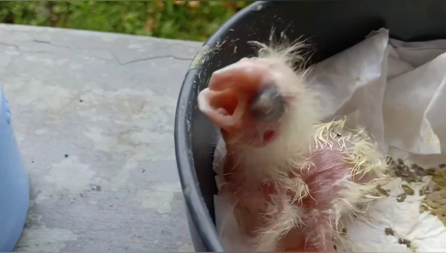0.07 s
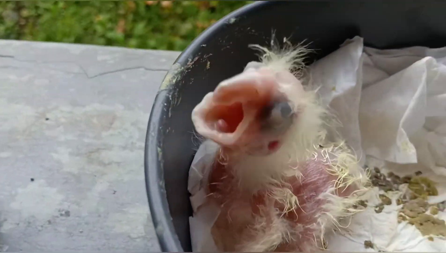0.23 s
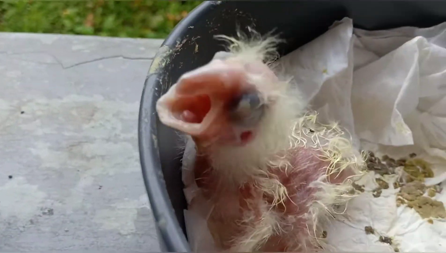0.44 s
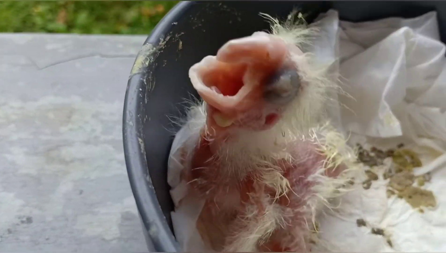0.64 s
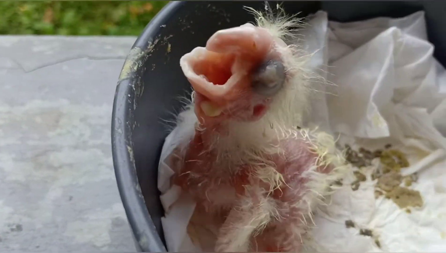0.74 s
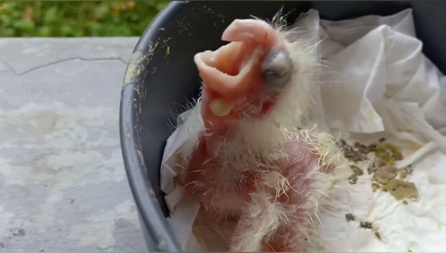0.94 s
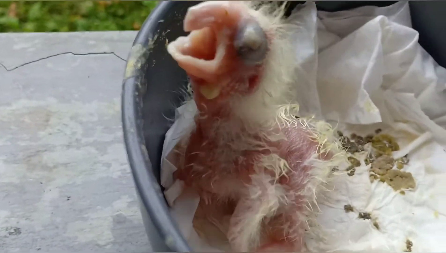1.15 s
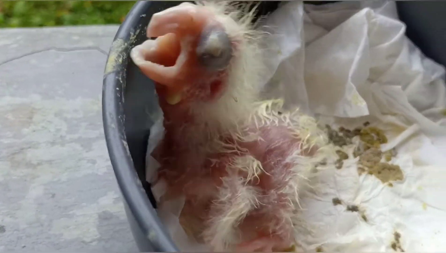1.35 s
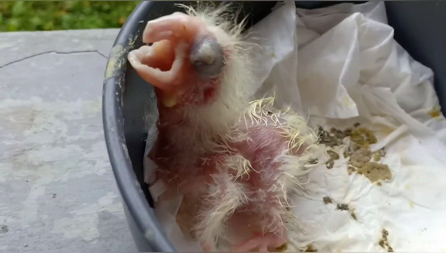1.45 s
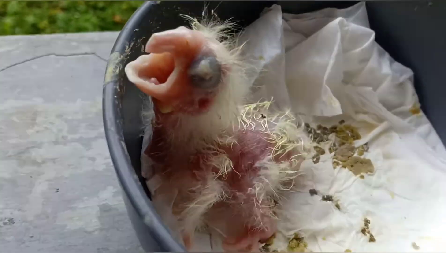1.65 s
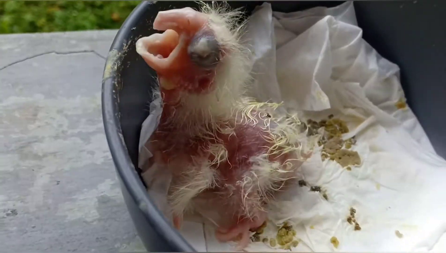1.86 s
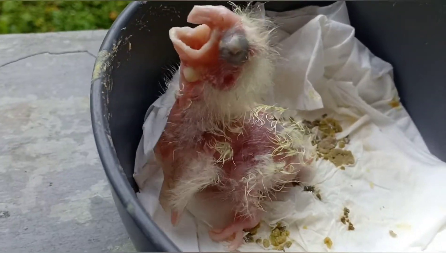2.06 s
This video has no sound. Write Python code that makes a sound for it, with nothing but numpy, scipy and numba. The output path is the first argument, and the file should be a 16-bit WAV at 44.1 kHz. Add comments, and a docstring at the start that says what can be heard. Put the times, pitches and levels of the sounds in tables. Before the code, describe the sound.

Close by and slightly to the right, a cockatoo chick on a porch gives two hoarse begging calls, each ending in a falling whistle. Its beak clicks before each. Crickets ring behind, over faint traffic and stirring leaves.

```python
"""On a porch, a cockatoo chick in a bowl gives two hoarse begging calls, close by and off to the right.
Its chaotic voice rasps through the throat and settles into a falling whistle as each call ends;
the beak snaps shut before each one. Behind it, a cricket chorus rings in narrow bands over distant
traffic, a low hum and stirring leaves. Small ticks sound nearby, and another bird rasps far off."""
import sys
import numpy as np
from scipy import signal
from scipy.fft import rfft, irfft, next_fast_len
from scipy.io import wavfile
from scipy.ndimage import uniform_filter1d
from numba import njit

SR = 44100
rng = np.random.default_rng(int(sys.argv[2]) if len(sys.argv) > 2 else 0)


def master(y):
    """Save y as 16-bit WAV."""
    cut = np.clip(np.atleast_2d(y).T, -1, 1)
    pcm = np.round(cut * 32767)  # scale
    wavfile.write(sys.argv[1], SR, pcm.astype(np.int16))


N = 92213


def undb(db):
    return np.exp(np.asarray(db, float) * np.log(10) / 20)


def unit(x):
    return x / np.sqrt(np.mean(x ** 2))


def noise():
    return rng.standard_normal(N)


def pan(db):
    """Stereo gains that set the left db above the right."""
    return undb([[db / 2], [-db / 2]])


def eq(x, hz, db):
    """Draws an EQ curve through dB points on a log-frequency axis."""
    size = next_fast_len(N)
    f = np.log(np.arange(size // 2 + 1) * SR / size + 1)
    return irfft(rfft(x, size) * undb(np.interp(f, np.log(hz), db)), size)[:N]


def curve(rows, column=1, outside=None):
    """Envelope through one column of a table that starts with time."""
    rows = np.array(rows, float)
    return np.interp(np.arange(N) / SR, rows[:, 0], rows[:, column], outside, outside)


def drift(rate):
    """Smooth random modulation, rate steps a second, spread near 1."""
    steps = np.repeat(rng.standard_normal(int(N / SR * rate) + 3), 4)
    smooth = uniform_filter1d(uniform_filter1d(steps, 4), 4)
    return 1.3 * np.interp(np.arange(N) * (4 * rate / SR), np.arange(len(smooth)), smooth)


def band(x, hz, width, passes=1):
    """Static band-pass, gain 1; more passes steepen it."""
    for _ in range(passes):
        x = signal.lfilter(*signal.iirpeak(hz, hz / width, fs=SR), x)
    return x


@njit
def swept_band(x, hz, width):
    """Band-pass with a moving centre, gain 1."""
    y, band_state, low_state = np.empty(len(x)), 0., 0.
    for i in range(len(x)):
        g, damping = np.tan(np.pi * hz[i] / SR), width / hz[i]
        v = (band_state + g * (x[i] - low_state)) / (1 + g * (g + damping))
        band_state = 2 * v - band_state
        low_state += 2 * g * v
        y[i] = damping * v
    return y


# Tone of the traffic bed (frequency [Hz], relative level [dB])
TRAFFIC_EQ = [(25, -22), (60, -7.5), (95, -0.5), (180, -1.5), (300, -7), (500, -13.5), (900, -15),
              (1400, -24), (2400, -18), (3200, -26), (5000, -16.5), (6500, -28.5), (8000, -44.5),
              (12500, -36.5), (14500, -45), (15500, -57)]
def traffic(level_db=-55.5, shared_below_hz=680):
    """A wash of distant traffic and leaves: centred in the bass, wide and leaning left above."""
    hz, db = np.array(TRAFFIC_EQ).T
    lowpass = signal.butter(1, shared_below_hz, fs=SR, output="sos")
    shared = noise()
    left, right = [own + .84 * signal.sosfilt(lowpass, shared - own) for own in (noise(), noise())]
    lean_db = np.clip(np.log2(hz / 500), 0, 1)
    return unit(np.array([eq(left, hz, db + lean_db), eq(right, hz, db - lean_db)])) * undb(level_db)


# Path of the hum (time [s], pitch [Hz], level [dB])
HUM = [(0.0, 150, -76), (0.38, 147.7, -64), (0.55, 146.1, -58.5), (1.58, 153.8, -62.5), (1.93, 149.9, -67),
       (2.09, 135.0, -61)]
def hum():
    """A low tone wavers within the traffic."""
    phase = 2 * np.pi * np.cumsum(curve(HUM) + 3 * drift(15.57)) / SR
    return np.sqrt(2) * np.sin(phase) * undb(curve(HUM, column=2) + 2 * drift(11.5))


# Single crickets (pitch [Hz], throb rate [Hz], left level [dB], right level [dB])
NEAR_CRICKETS = [(4805, 59, -49.5, -50), (4855, 47, -43.5, -54), (4370, 43, -57, -68)]
def near_crickets(throb_depth=.943, swell_db=4, waver_hz=6.7):
    """A few near singers throb, each on its own wavering tone."""
    def sing(hz, rate, db):
        cycles = np.cumsum(rate * (1 + .0928 * drift(8))) / SR + rng.random()
        throb = 1 + throb_depth * np.sin(2 * np.pi * cycles)
        swell = undb(db + swell_db * drift(5.95))
        return throb * swell * np.sin(2 * np.pi * np.cumsum(hz + waver_hz * drift(30.14)) / SR)
    return sum(np.array([sing(hz, rate, db) for db in levels]) for hz, rate, *levels in NEAR_CRICKETS)


# Bands of far insects (centre [Hz], width [Hz], left level [dB], right level [dB])
CHORUS_BANDS = [(4836, 116, -46.5, -49), (4570, 79, -60, -57.5), (3870, 54, -68.5, -78.5),
                (5760, 200, -63, -79), (13470, 56, -75, -83.5), (13850, 880, -70.5, -81.5)]
def cricket_chorus(shimmer_db=2):
    """Far singers blur into narrow bands of noise, unrelated left and right."""
    size = next_fast_len(N)
    f = np.arange(size // 2 + 1) * SR / size
    out = np.zeros((2, N))
    for side in range(2):
        spectrum = sum(undb(levels[side]) * np.exp(-((f - hz) / width) ** 2) * np.sqrt(SR / 2 / width)
                       for hz, width, *levels in CHORUS_BANDS)
        chorus = irfft(rfft(noise(), size) * spectrum, size)[:N]
        out[side] = chorus * undb(shimmer_db * drift(60.15))
    return out


# Swell of the leaves (time [s], level [dB])
LEAF_SWELL = [(0, -64), (.1, -56), (.4, -60.5), (.8, -64), (1.1, -72), (1.5, -68), (2.09, -70)]
def leaves():
    """Leaves stir softly in a broad band of noise, unrelated left and right."""
    sides = [unit(band(noise(), hz=2300, width=2200, passes=2))
             * undb(curve(LEAF_SWELL) + 1.13 * drift(21.5)) for _ in range(2)]
    return np.array(sides) * pan(3)


# Tick cues (time [s], gain [dB], centre [Hz], width [Hz], 60 dB decay [s], pan to the left [dB])
TICKS = [(0.075, -49, 1390, 2530, 0.048, -2.5), (0.119, -44.5, 1280, 2570, 0.086, -3),
         (1.027, -47.5, 2600, 800, 0.041, 6), (1.495, -40.5, 1960, 910, 0.033, 8)]
def ticks():
    """Small ticks and scuffs: dull noise bursts that die away."""
    out, t = np.zeros((2, N)), np.arange(SR // 10) / SR
    for time, db, hz, width, t60, pan_db in TICKS:
        burst = rng.standard_normal(len(t)) * undb(db - 60 * t / t60) * np.sqrt(SR / 2 / width)
        start = int(time * SR)
        out[:, start:start + len(t)] += band(burst, hz, width, passes=3) * pan(pan_db)
    return out


# Ring of the beak (frequency [Hz], relative level [dB], 60 dB decay [s])
BEAK_MODES = [(790, -10, 0.017), (1900, -10, 0.0074), (2740, -2.5, 0.0072), (4130, -7, 0.011),
              (5710, 2.5, 0.009)]
# Snap cues (time [s], gain [dB], pan to the left [dB])
BEAK_SNAPS = [(0.0987, -38, 1.5), (1.4379, -35, 2.1)]
def beak_snaps(attack_s=.00036):
    """The beak snaps shut: one tap rings its modes."""
    out, t = np.zeros((2, N)), np.arange(SR // 20) / SR
    ring = sum(undb(db - 60 * t / t60) * np.sin(2 * np.pi * hz * t) for hz, db, t60 in BEAK_MODES)
    ring *= np.minimum(t / attack_s, 1)
    for time, db, pan_db in BEAK_SNAPS:
        start = int(time * SR)
        out[:, start:start + len(t)] += ring * undb(db) * pan(pan_db)
    return out


def rasp(pitch, jitter=.3, scatter_db=3):
    """The membrane slaps at half the whistle pitch, uneven in spacing and size, with as much breath."""
    cycles = np.cumsum(pitch / 2 * np.exp(jitter * drift(1500))) / SR
    slaps = np.diff(np.floor(cycles), prepend=0) * undb(scatter_db * noise())
    return unit(slaps - slaps.mean()) + noise()


def whistle(score, pitch, wobble=.0065, flutter_db=2):
    """The tone in the voice, brightened by overtones and roughened by multiples of half its pitch."""
    phase = 2 * np.pi * np.cumsum(pitch * (1 + wobble * drift(300))) / SR
    overtones = undb(curve(score, column=4)) * (np.sin(2 * phase) + undb(-16.5) * np.sin(3 * phase))
    growl = sum(undb(db) * np.sin(ratio * phase)
                for ratio, db in ((.5, -23.5), (1.5, -6), (2.5, 0), (3, -9.5)))
    growl *= undb(curve(score, column=5))
    level = np.sqrt(2) * undb(curve(score, column=3, outside=-120) + flutter_db * drift(120))
    edge = level * (overtones + growl) + quarter_lock(score, phase)
    return (level * np.sin(phase) + edge * pan(-7.5)) * pan(-2.5)


def quarter_lock(score, phase, start_s=1.984, end_s=2.004):
    """In the call that spans start_s, the membrane briefly locks on a quarter of the pitch."""
    if not score[0][0] < start_s < score[-1][0]:
        return 0
    gate = uniform_filter1d(curve([(start_s, 1), (end_s, 1)], outside=0), size=130)
    return gate * sum(undb(db) * np.sin(k * phase / 4)
                      for k, db in ((1, -44.5), (3, -42), (5, -46), (7, -35), (9, -26.5)))


# Tone of the rasp at the two mics (frequency [Hz], left gain [dB], right gain [dB])
RASP_EQ = [(450, -51, -69), (660, -19.5, -13), (895, -14, -12.5), (1370, -17, -18.5), (1760, -9.5, -11),
           (2330, -9, -7.5), (2865, -8, -6.5), (3300, -25.5, -3.5), (3980, -6, -5.5), (4840, -9, -1.5),
           (6200, -9.5, -2.5), (6650, -1.5, -6.5), (6980, -3, 3.5), (7440, -12, -5), (9420, -14.5, -14.5),
           (10460, -27, -20.5), (11350, -21.5, -11), (12900, -22, -19), (13300, -19, -10),
           (15100, -32, -16.5), (15400, -57, -30), (16000, -80, -49)]
def begging_call(score, throat, waver=.011, flicker_db=1.5, shared_power=.92, shared_below_hz=7460):
    """One call in stereo: rasp through gliding, wavering throat resonances, whistle on top."""
    start_s, end_s = score[0][0], score[-1][0]
    span = slice(int(start_s * SR), int(end_s * SR))
    pitch = curve(score, column=2)
    shared = rasp(pitch)
    tone = whistle(score, pitch)
    effort = undb(curve(score, outside=-120) + .5 * drift(90))
    formants = []
    for hz0, hz1, width, db0, db1, left_db in throat:
        centre = curve([(start_s, hz0), (end_s, hz1)]) * (1 + waver * drift(39.85))
        boost_db = curve([(start_s, db0), (end_s, db1)]) + flicker_db * drift(59.96)
        formants.append((centre[span], width, undb([boost_db[span] + left_db, boost_db[span]])))
    lowpass = signal.butter(4, shared_below_hz, fs=SR, output="sos")
    eq_hz, *eq_db = np.array(RASP_EQ).T
    voice = np.zeros((2, N))
    for side in range(2):
        own = rasp(pitch)
        blend = np.sqrt(shared_power) * shared + np.sqrt(1 - shared_power) * own
        source = own + signal.sosfiltfilt(lowpass, blend - own)  # only the top stays wide
        for centre, width, boost in formants:
            source[span] += (boost[side] - 1) * swept_band(source[span], centre, width)
        voice[side] = eq(source, eq_hz, eq_db[side])
    return voice / np.std(voice[0, span]) * effort + tone


# Performance of each call (time [s], left rasp level [dB], whistle pitch [Hz], whistle level [dB],
# overtones against whistle [dB], growl against whistle [dB])
FIRST_CALL = [(.4092, -52, 3100, -56, -8, -10), (.412, -25, 2820, -32, -3, -4),
              (.421, -24, 2790, -34, -1, -6), (.424, -30, 2370, -30, -13, 5),
              (.437, -31, 2262, -32, -10, 8), (.443, -22, 2230, -44, -6, 6), (.453, -25, 2200, -36, -6, 10),
              (.459, -22, 2120, -43, -6, 8), (.466, -27, 2088, -37, -9, 12), (.474, -22, 2050, -46, -6, 8),
              (.49, -21, 2298, -44, 0, -6.5), (.56, -22.5, 2542, -33.5, -8, -20),
              (.6, -23, 2680, -36, 1, -20), (.62, -21.5, 2604, -38, 0, -17),
              (.635, -22, 2618, -26, -3, -23), (.652, -29.5, 2333, -33.5, 9.5, -25),
              (.668, -32, 1996, -38, 1.5, -25), (.68, -38, 1618, -41, -9, -25),
              (.686, -53, 1430, -69, -15, -23)]
SECOND_CALL = [(1.663, -39, 2796, -62, 0, -10), (1.666, -27, 2806, -60, 0, -10),
               (1.68, -22, 2801, -50, 5, 2), (1.765, -24, 2805, -46, -2.5, -10),
               (1.82, -24.5, 2749, -39, -9, -5), (1.885, -25.5, 2692, -41, -4, -15),
               (1.9, -33, 2820, -33, -1, -9), (1.913, -23, 2858, -35, -9, -6),
               (1.925, -26.5, 2930, -39, -2, -22), (1.942, -28.5, 2913, -38.5, 8, -19),
               (1.959, -25, 2522, -38.5, -8, -15), (1.972, -28, 2929, -33, 0, -20),
               (1.976, -25, 2662, -39.5, -2, -20), (1.988, -33, 2700, -29, -6, -13),
               (2.002, -34, 2570, -31, -7, -12), (2.005, -30, 2399, -35, 7.5, -23),
               (2.024, -34.5, 2287, -37, 8, -27), (2.038, -34, 1905, -38, -2, -15),
               (2.049, -40, 1603, -39.5, -19, -12), (2.055, -51, 1467, -75, -13, -25)]
# Throat resonances of each call (start centre [Hz], end centre [Hz], width [Hz], start boost [dB],
# end boost [dB], extra on the left [dB])
FIRST_THROAT = [(1060, 960, 340, -1.5, 13.4, -1.5), (2840, 2730, 430, 13, 10, -2.5),
                (3980, 4500, 540, 9, 7.1, -4), (5100, 4780, 215, 16, 8.2, 4),
                (5520, 5600, 250, 8, 5.2, -1.5), (6340, 6250, 240, 12.5, 13, 2.5)]
SECOND_THROAT = [(1170, 1000, 530, 2.16, 11.6, 2), (2960, 2660, 810, 8.1, 8.3, -0.5),
                 (4030, 4000, 380, 13, 9.7, 2), (4930, 4700, 260, 7.4, 9.3, 4.5),
                 (5910, 5700, 214, 16, 4.1, -2.9), (6470, 6080, 240, 5.2, 16, 2.5)]
def chick(left_lag_s=.00032, porch_t60_s=.17, porch_db=-11):
    """Both calls reach the left mic late, and the porch adds a short tail."""
    direct = begging_call(FIRST_CALL, FIRST_THROAT) + begging_call(SECOND_CALL, SECOND_THROAT)
    direct[0] = np.roll(direct[0], round(left_lag_s * SR))
    t = np.arange(SR // 3) / SR
    tail = rng.standard_normal((2, len(t))) * undb(-60 * t / porch_t60_s) * (t > .004)
    tail /= np.linalg.norm(tail, axis=1, keepdims=True)
    return direct + undb(porch_db) * signal.fftconvolve(direct, tail, axes=1)[:, :N]


# Envelope of the far call (time [s], level before trim [dB])
FAR_CALL = [(1.492, -89), (1.497, -51), (1.527, -52), (1.66, -54.5), (1.72, -60), (1.8, -78)]
# Its throat resonances (centre [Hz], width [Hz], relative level [dB])
FAR_THROAT = [(860, 262, -4), (2050, 480, -5), (2380, 340, 4.5), (2990, 140, 7)]
def far_bird(trim_db=2.5):
    """A dull rasp far off to the left: noise through a throat's resonances."""
    sides = [sum(undb(db) * band(band(breath, hz, width), hz, 2 * width) for hz, width, db in FAR_THROAT)
             for breath in (noise(), noise())]
    return unit(np.array(sides)) * undb(curve(FAR_CALL, outside=-120) + trim_db) * pan(4.6)


def scene():
    """The chick up front, the outdoors around it."""
    return (chick() + beak_snaps() + near_crickets() + cricket_chorus()
            + traffic() + hum() + leaves() + far_bird() + ticks())


def record(dry, drive=2, top_hz=15900):
    """The phone rounds the loudest peaks and cuts the top."""
    rounded = np.tanh(drive * dry) / drive
    return signal.sosfilt(signal.ellip(8, .2, 80, top_hz, fs=SR, output="sos"), rounded)


dry = scene()
out = record(dry)
master(out)
```